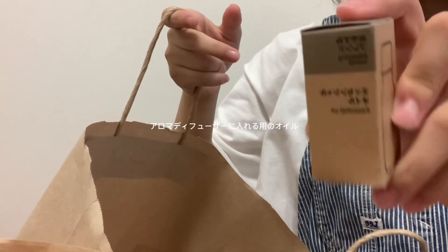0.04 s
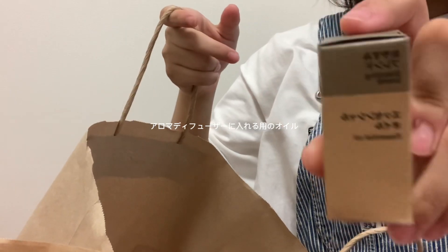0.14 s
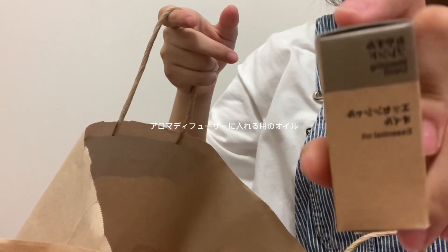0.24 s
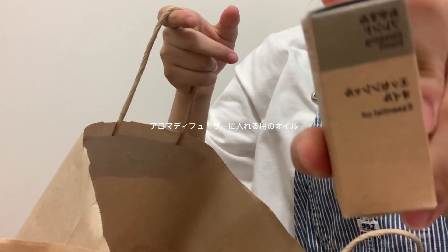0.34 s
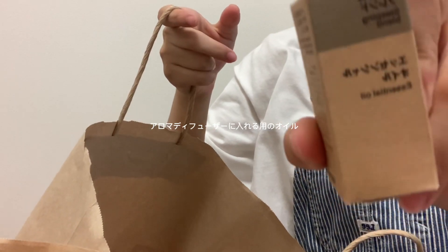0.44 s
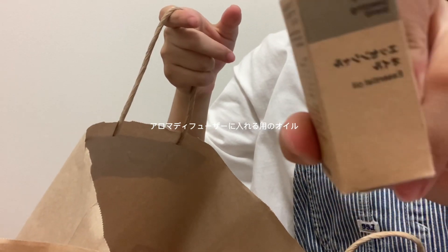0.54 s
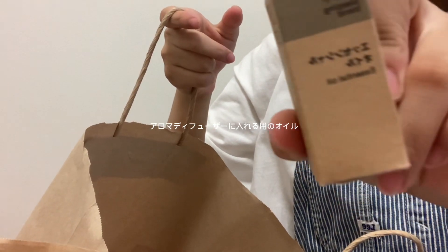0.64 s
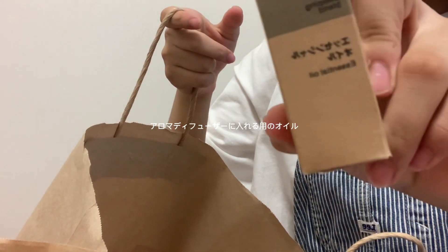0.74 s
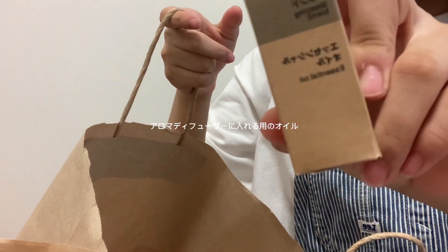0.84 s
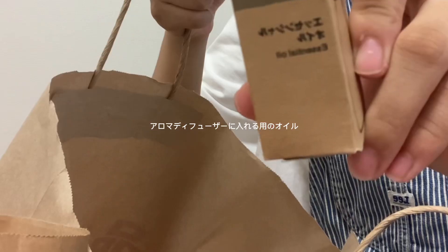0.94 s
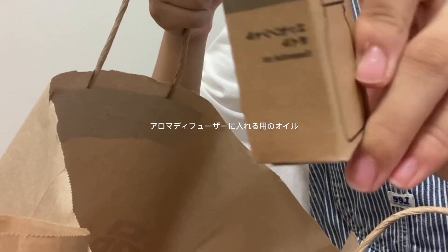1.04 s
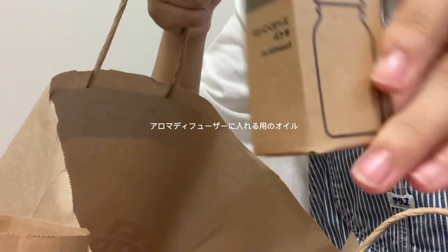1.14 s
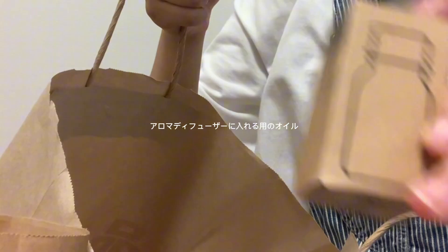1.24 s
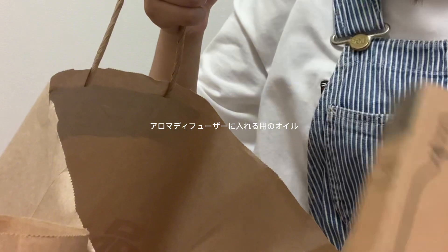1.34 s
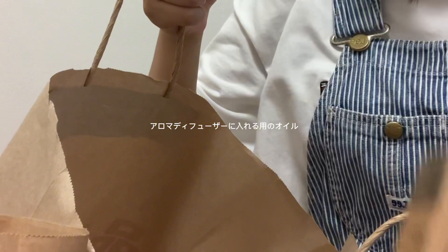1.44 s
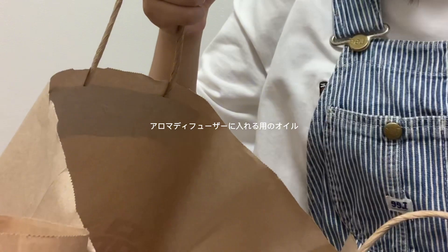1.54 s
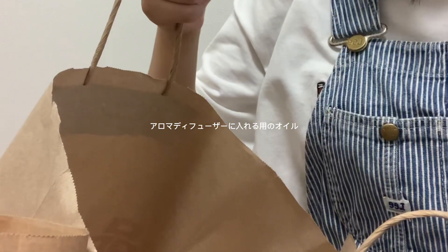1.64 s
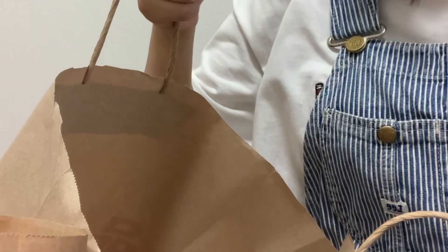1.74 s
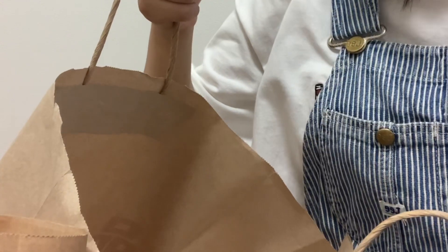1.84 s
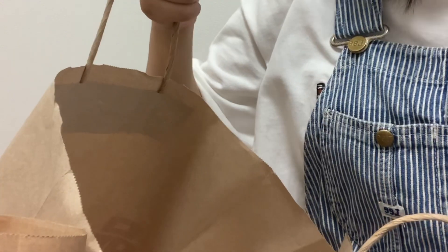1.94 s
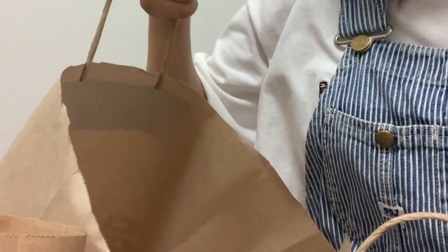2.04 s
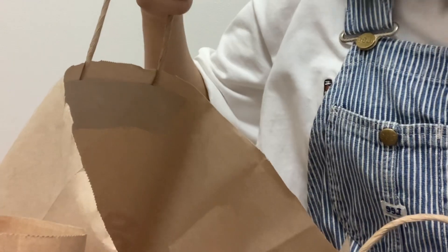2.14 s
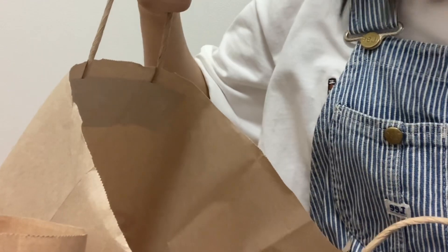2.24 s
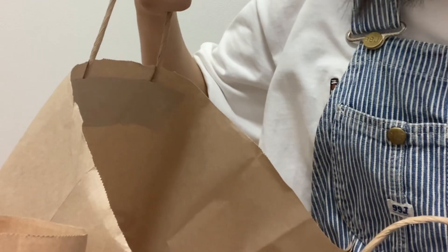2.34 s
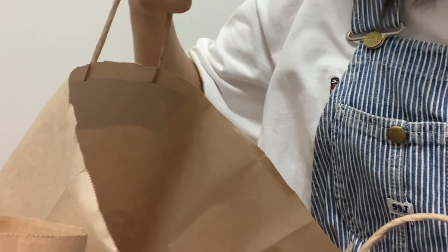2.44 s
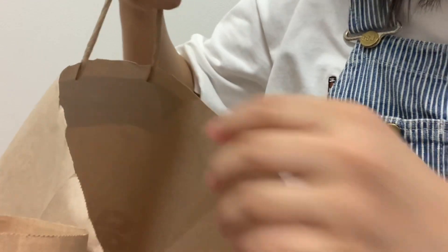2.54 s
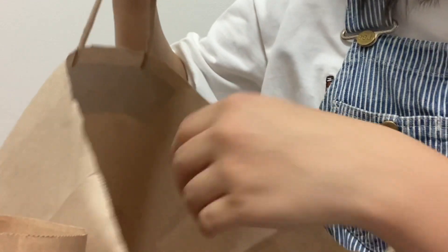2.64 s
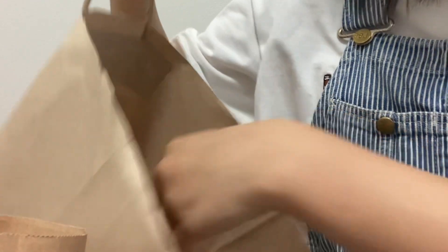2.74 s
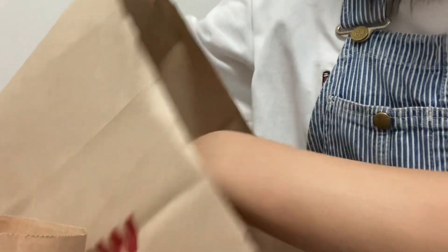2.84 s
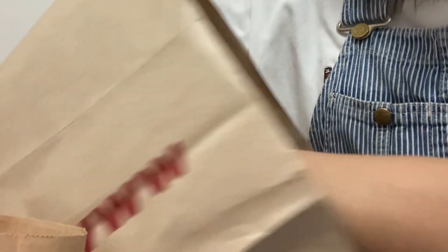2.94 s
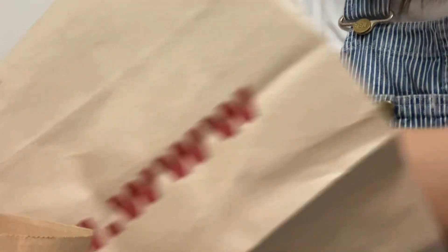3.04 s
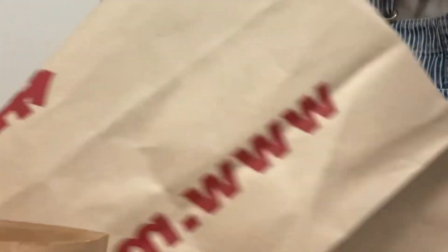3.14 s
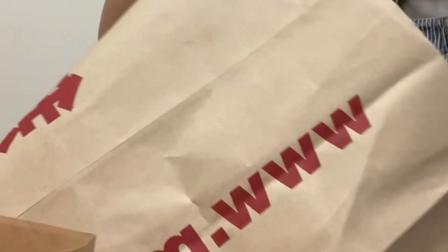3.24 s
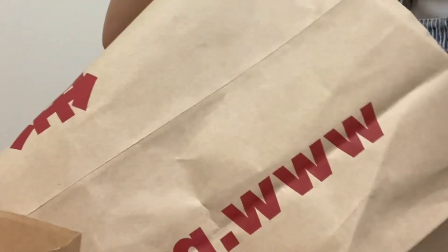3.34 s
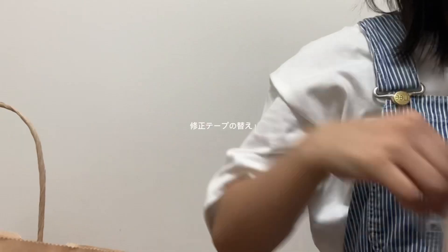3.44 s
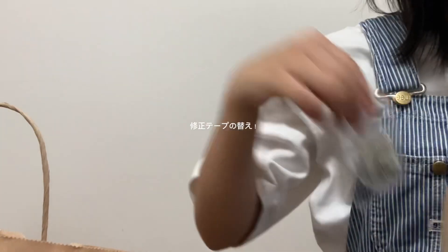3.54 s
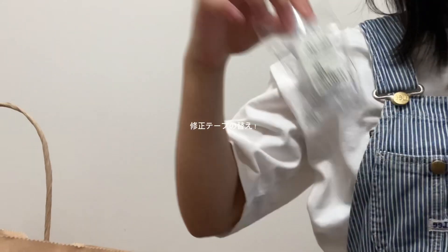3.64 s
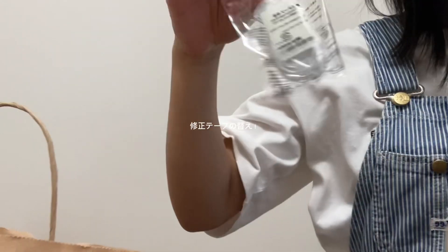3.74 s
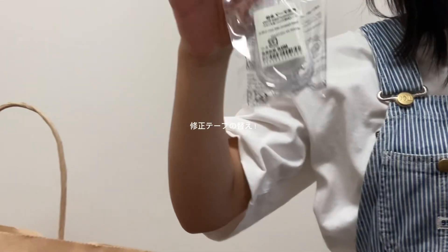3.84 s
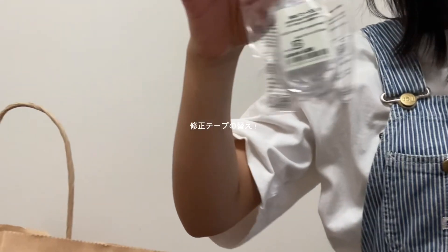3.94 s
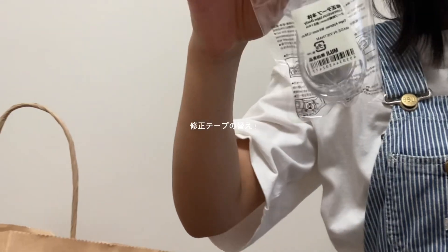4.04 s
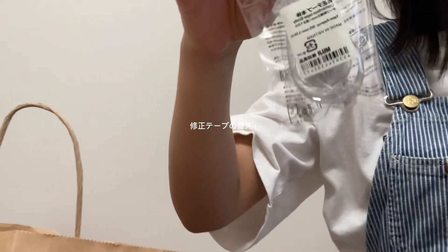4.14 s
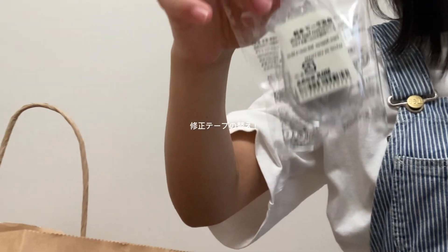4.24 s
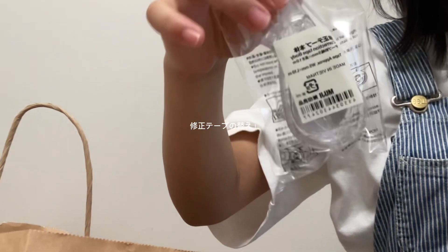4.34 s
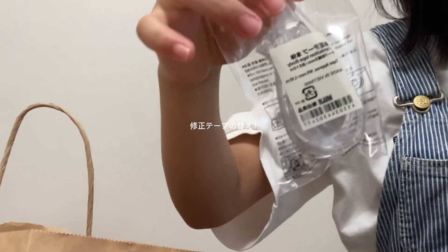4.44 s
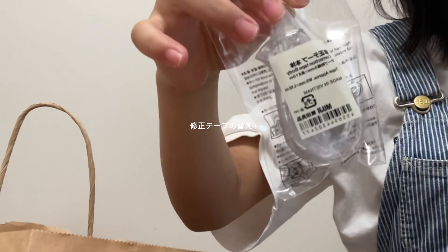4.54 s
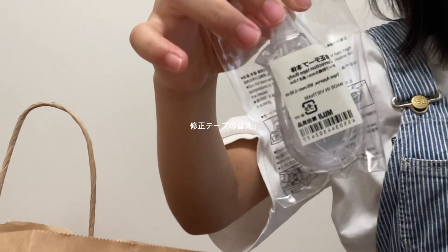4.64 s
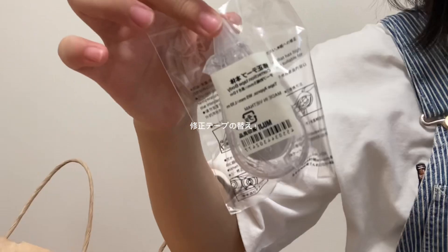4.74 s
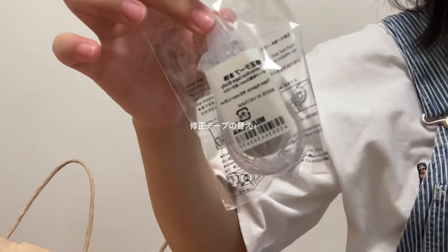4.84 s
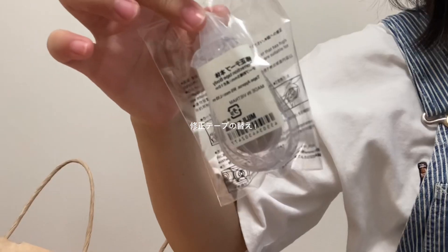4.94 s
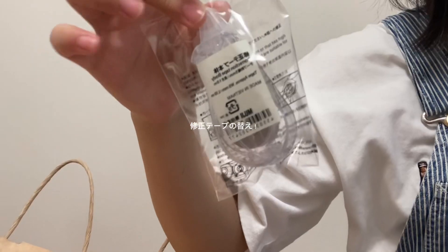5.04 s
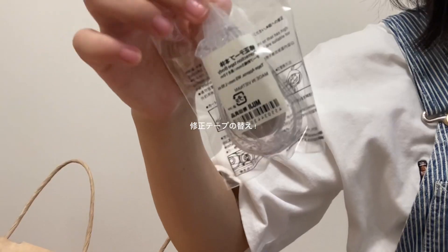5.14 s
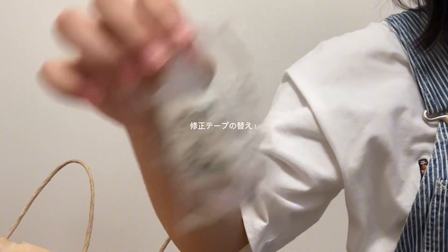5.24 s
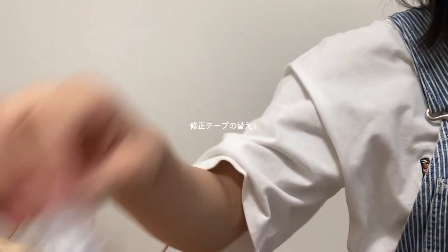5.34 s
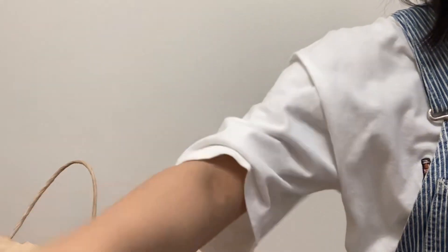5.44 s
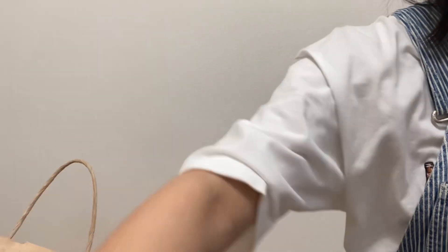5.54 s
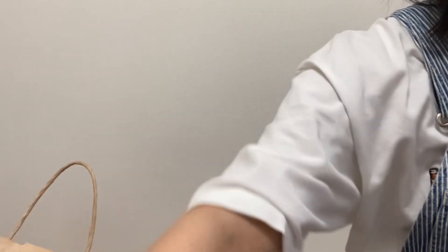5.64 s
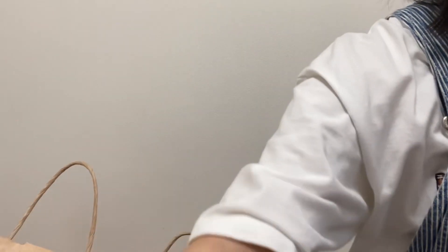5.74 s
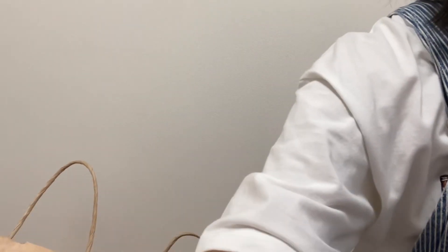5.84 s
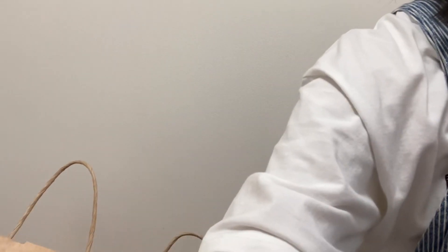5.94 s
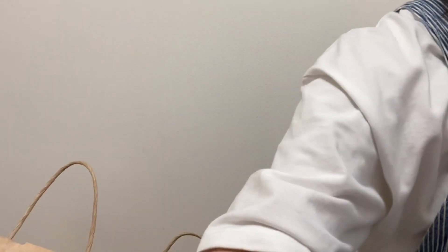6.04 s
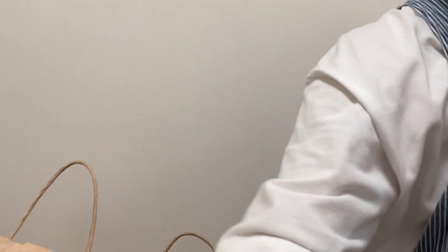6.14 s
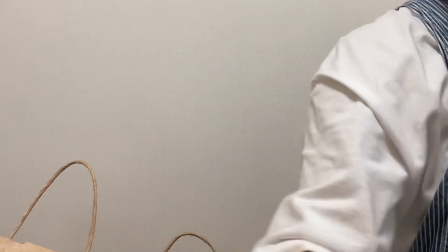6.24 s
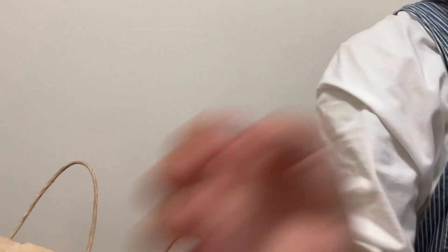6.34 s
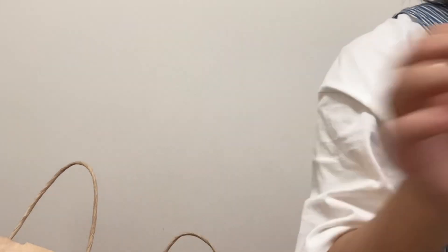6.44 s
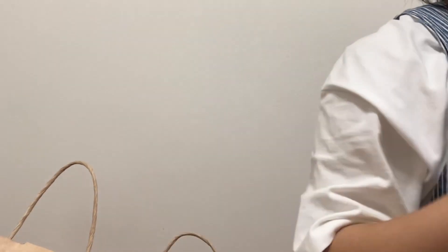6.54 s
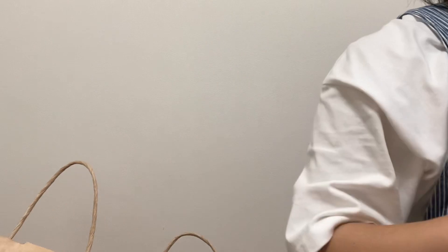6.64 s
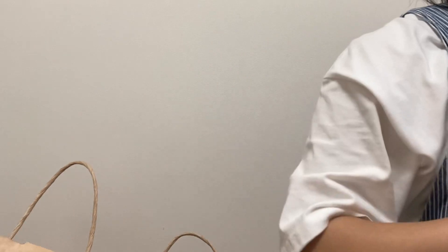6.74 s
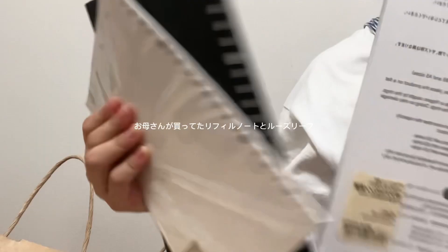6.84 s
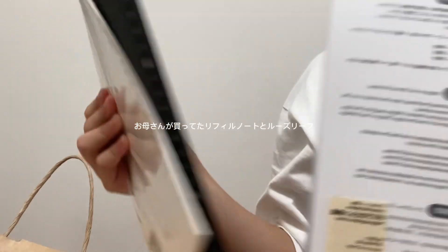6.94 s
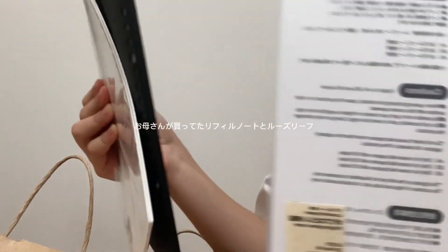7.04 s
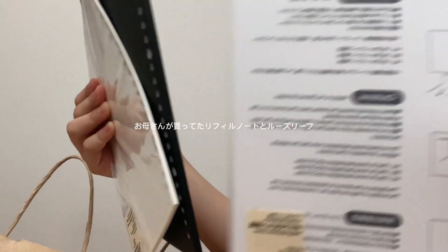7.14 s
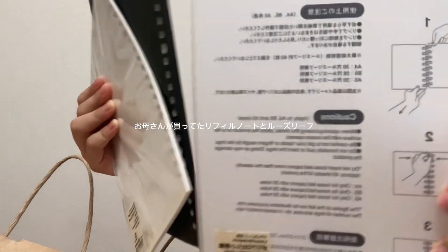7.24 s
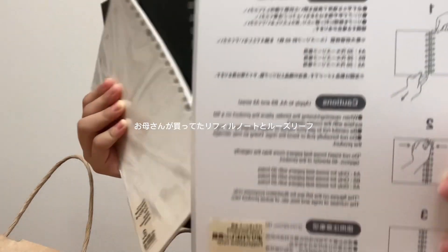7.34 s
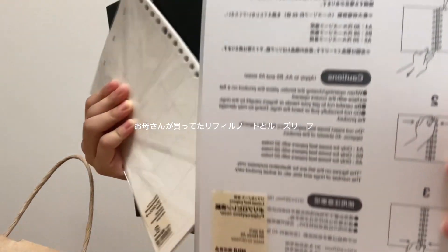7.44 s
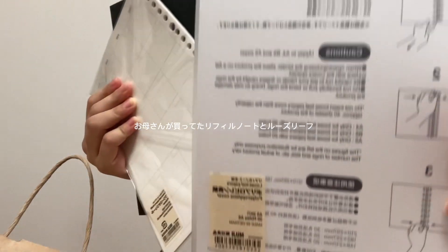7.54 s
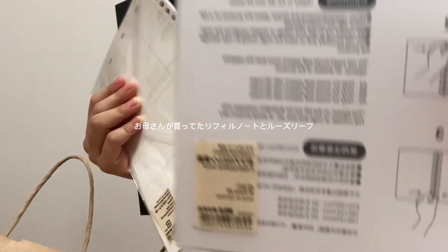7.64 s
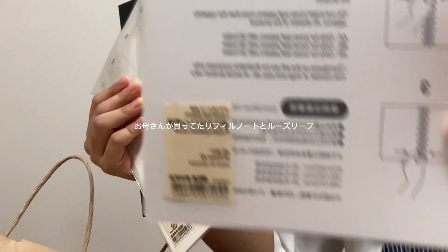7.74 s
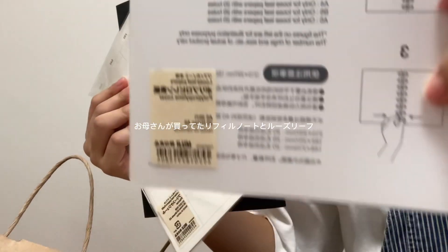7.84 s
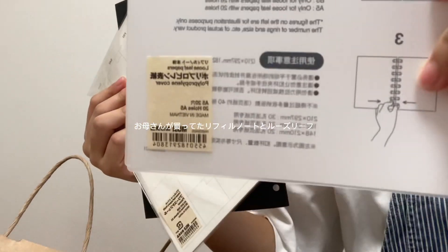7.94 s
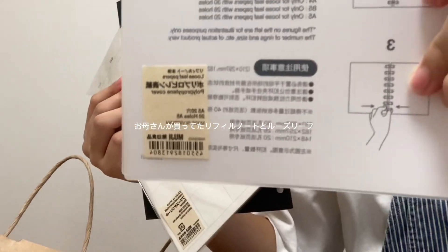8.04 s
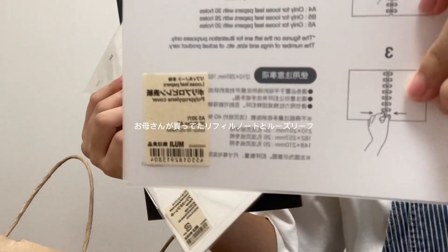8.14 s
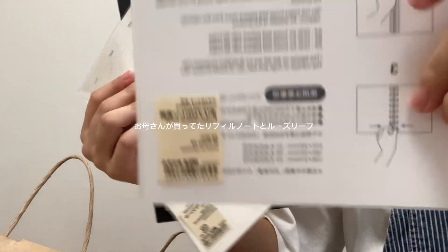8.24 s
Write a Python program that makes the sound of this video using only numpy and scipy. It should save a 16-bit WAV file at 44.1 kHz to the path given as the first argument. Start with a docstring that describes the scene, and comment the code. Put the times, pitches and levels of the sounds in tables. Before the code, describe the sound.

Close dry handling of packaged shopping: faint cardboard taps, a burst of stiff paper crumpling, plastic rustles and clacks over very low ventilation rumble.

```python
"""Shopping is unpacked close to the microphone in a small, quiet room, with a faint rumble of ventilation.
First fingers turn a little carton, then a hand rummages in a paper bag that buckles and crackles.
Next a plastic pouch is shaken and put down, and last some wrapped notebooks are lifted out.
Touches are short noise bursts, stiff panels are dying sine tones, and rustle is coloured grains and hiss.
Crackles are tiny tones. The ventilation is filtered noise, and the room answers with noise-like echoes."""
import sys
import numpy as np
from scipy import signal
from scipy.fft import rfft, irfft, next_fast_len
from scipy.io import wavfile
from scipy.ndimage import uniform_filter1d, map_coordinates

SR = 44100
rng = np.random.default_rng(int(sys.argv[2]) if len(sys.argv) > 2 else 0)


def store_wav(level_fs):
    """Save 16-bit WAV to argv[1]."""
    pcm = np.round(np.clip(np.atleast_2d(level_fs), -1, 1) * 32767)
    wavfile.write(sys.argv[1], SR, pcm.T.astype(np.int16))


N = 364707
TIME = np.arange(N) / SR

# Still air. Each row: frequency in Hz, relative level in dB per Hz.
AIR_SPECTRUM = [(20, -12), (28, -10), (60, -5), (82, -6.5), (115, -14.5), (200, -24), (400, -33),
                (1000, -50), (2500, -60.5), (6500, -64), (9000, -52), (15000, -55.5)]
# Diffuse sound. Each row: frequency in Hz, left-right likeness from -1 to 1.
EAR_LIKENESS = [(50, 0.67), (200, 0.92), (500, 0.53), (1000, 0.4), (2000, -0.28), (4000, 0.28),
                (9000, 0.13)]
# What the room gives back. Each row: frequency in Hz, relative level in dB.
ROOM_SPECTRUM = [(80, -7.5), (200, -2.5), (400, 0.5), (1000, -3), (4000, 1), (9000, -0.5), (15000, -4.5)]
# Where the hands work. Each row: time in seconds, lag of the left ear in ms, how much louder it is in dB.
HAND_PLACES = [(0, 0.17, 2.5), (.1, -0.027, 2.5), (2.799, -0.068, 1.5), (3.2, -0.22, 1), (3.5, 0.15, 0),
               (4.4, 0.24, 0.5), (6.2, .24, 0.5), (8.27, .24, 3)]

# Colours of the rustle: bending, rubbing and fine crinkle. Each row: frequency in Hz, relative dB per Hz.
FLEX_SPECTRUM = [(50, -17), (90, 4.5), (150, -5.5), (250, -1), (380, -2), (550, -6.5), (900, -15.5),
                 (2000, -50.5)]
RUB_SPECTRUM = [(300, -26.5), (600, -8), (1000, 0.5), (1600, -2), (2600, -5.5), (4000, -13.5), (6500, -17),
                (12000, -46)]
CRINKLE_SPECTRUM = [(2000, -18.5), (4200, 1), (5500, -2.5), (6800, -0.5), (8800, 1.5), (10500, -4.5),
                    (14500, -1), (16000, -27)]
# The things never lie quite still in the hands. Each row: time in seconds, light rubbing in relative dB.
FIDGETING = [(0, -57.5), (.35, -79), (.7, -83.5), (1.1, -81.5), (1.25, -76), (2.15, -63.5), (2.34, -64),
             (2.41, -81.5), (2.48, -65), (2.62, -52.5), (3.7, -52.5), (4.25, -59.5), (4.65, -48.5),
             (4.78, -47.5), (4.98, -94), (5.9, -50.5), (6.45, -53), (6.72, -67.5), (7.25, -82), (7.5, -88),
             (8.27, -84)]
# Strokes of the hand: turning the carton, rummaging, shaking the pouch, drawing out the notebooks.
# Each row: start in seconds, hold in seconds, then rubbing, flexing and fine crinkle in relative dB.
HAND_STROKES = [ (0.0, 0.013, -47.5, -67, -55), (0.15, 0.0083, -48, -44.5, -82),
                (1.16, 0.012, -57.5, -61.5, -78), (1.93, 0.061, -64.5, -68, -63),
                (2.04, .02, -55, -49, -66), (2.24, 0.051, -65.5, -50.5, -71),
                (2.534, 0.023, -42, -35.5, -63), (2.765, 0.054, -37, -37, -51),
                (2.94, 0.0092, -46.5, -35.5, -47), (3.044, 0.13, -35, -37.5, -38.5),
                (3.158, 0.011, -31, -29, -46), (3.27, 0.11, -46, -45, -56),
                (3.471, 0.054, -42.5, -44.5, -55), (3.56, 0.04, -42, -41, -47),
                (3.66, 0.085, -45, -47, -52), (4.02, 0.022, -59, -49, -66), (4.401, 0.014, -36.5, -39, -45),
                (4.468, 0.024, -34.5, -37, -45), (4.52, 0.021, -43.5, -44.5, -43.5),
                (4.57, 0.1, -48, -50.5, -55.5), (4.82, 0.061, -49.5, -53.5, -59.5),
                (4.91, 0.062, -57.5, -47, -75), (5.03, 0.057, -58, -58.5, -64),
                (5.159, 0.0083, -44, -55, -42.5), (5.22, 0.017, -46.5, -52.5, -48.5),
                (5.3, 0.1, -51, -54.5, -61.5), (5.41, 0.057, -55.5, -64, -54),
                (5.664, 0.056, -48, -57.5, -49.5), (5.738, 0.05, -45.5, -62, -45.5),
                (5.979, .15, -39.5, -39.5, -48.5), (6.197, 0.036, -37, -46.5, -39),
                (6.43, 0.038, -43, -50.5, -49), (6.53, 0.056, -55.5, -54, -59.5),
                (6.779, 0.046, -63.5, -58.5, -67), (7.24, 0.049, -67.5, -54.5, -73)]

# The paper bag crumpling in separate crackles. Each row: time in seconds, relative level in dB.
BAG_CRUMPLING = [(2.45, -104), (2.53, -48), (2.68, -45.5), (2.775, -33.5), (2.82, -39), (2.89, -66),
                 (3.0, -42), (3.09, -36.5), (3.17, -27.5), (3.21, -41), (3.29, -39.5), (3.5, -49.5),
                 (3.56, -34.5), (3.75, -53), (3.95, -87)]
# Clean knocks that set a stiff panel of card, paper or plastic ringing.
# Each row: start in seconds, relative level in dB, pitch in Hz, cycles until it has died away by 60 dB.
KNOCKS_ON_PANELS = [ (0.0075, -34, 375, 45), (0.1175, -46, 3850, 110), (0.1285, -45, 1320, 16),
                    (0.146, -42, 395, 20), (0.1605, -39, 420, 16), (0.2065, -39, 1486, 51),
                    (0.2295, -44.5, 1546, 53), (0.4775, -54.5, 1530, 27), (0.803, -60.5, 1475, 22),
                    (0.925, -62.5, 1400, 16), (1.9755, -54, 1970, 40), (2.0045, -51.5, 1080, 20),
                    (2.015, -46, 350, 34), (2.034, -49, 1360, 20), (2.279, -54.5, 1120, 71),
                    (2.537, -30, 410, 8.6), (2.5615, -32.5, 900, 17), (2.668, -32.5, 346, 6.1),
                    (2.7205, -34, 850, 13), (2.7125, -26.5, 1620, 14), (2.7605, -32, 2140, 11),
                    (3.1235, -22, 3730, 29), (3.1645, -25, 1190, 6.8), (3.170, -29, 428, 13),
                    (3.2905, -30, 290, 5.9), (3.5475, -27, 1030, 19), (3.969, -36, 1220, 14),
                    (4.002, -21.5, 1744, 29), (4.007, -29.5, 490, 17), (4.4085, -25.5, 360, 15.7),
                    (4.421, -38, 284, 4), (4.471, -30.5, 1670, 9.6), (4.4815, -34.5, 505, 9.8),
                    (4.596, -39, 910, 16), (4.7135, -30, 413, 19), (4.768, -25.5, 1320, 18.5),
                    (4.8635, -29, 307, 14), (5.984, -37.5, 424, 16), (6.055, -34, 474, 16),
                    (6.188, -24.5, 1070, 45), (6.1885, -26, 4100, 41), (6.393, -33.5, 552, 23),
                    (7.0415, -49, 1084, 18), (7.051, -53.5, 1125, 19), (7.065, -59, 996, 14),
                    (7.162, -65, 1290, 8), (7.177, -49.5, 1284, 9.3), (7.2505, -36.5, 397, 12.6),
                    (7.304, -56, 1400, 12), (7.545, -63, 1400, 13), (7.7615, -51, 958, 9.8),
                    (8.134, -60, 1080, 11), (8.168, -51, 320, 9), (8.199, -53.5, 1000, 10)]
# Ways such a panel vibrates. Each row: multiple of its pitch, dB for a knock of the usual number of cycles.
PANEL_VIBRATIONS = [(0.359, -14.5), (0.6, -11), (0.83, -6), (0.999, 0), (1.2, -6.5), (1.65, -10),
                    (2.5, -18)]

# Four tables of touches: fingers on the carton, the bag's handle and the clothes; creases of the paper bag
# giving way; packaged goods knocking against each other and the hand; thin plastic wrappers snapping.
# Each row: time in seconds, relative body level in dB, pitch in Hz, relative tick level in dB,
# length in seconds (the contacts use at least 0.002).
CARTON_TAPS = [(0.119, -50, 1870, -44.5, 0.03), (0.1583, -43, 1020, -53, 0.026),
               (0.2075, -57, 2000, -50, 0.016), (0.2312, -62, 2000, -55, 0.016),
               (0.314, -51.5, 377, -64, 0.026), (0.7886, -58.5, 515, -85, 0.023),
               (1.139, -47.5, 995, -76, 0.012), (1.2384, -52.5, 1130, -56.5, 0.007),
               (1.6125, -58, 1850, -50.5, 0.0052), (1.7245, -64, 2800, -71, 0.007),
               (1.781, -66, 1430, -58, 0.028), (1.91, -62, 324, -73, 0.031), (2.0264, -55, 510, -65, 0.064),
               (2.0774, -50, 2470, -48.5, 0.012), (2.095, -46.5, 2580, -54, 0.0058)]
CREASE_BUCKLES = [(2.4954, -33.5, 1600, -42.5, 0.011), (2.507, -30.5, 970, -61.5, 0.035),
                  (2.6593, -31, 1980, -47, 0.034), (2.6918, -25.5, 1070, -39.5, 0.019),
                  (2.7175, -21, 1707, -35, 0.032), (2.7448, -27, 1940, -41.5, 0.0058),
                  (2.7805, -34.5, 1700, -54, 0.016), (2.866, -42, 1106, -57, 0.015),
                  (3.064, -36, 2508, -53.5, 0.017), (2.8155, -34, 1190, -38, 0.014),
                  (2.9243, -32, 1560, -46, 0.045), (2.9345, -25.5, 1620, -29.5, 0.023),
                  (3.0232, -28, 900, -39, 0.044), (3.1272, -23, 1150, -45.5, .008),
                  (3.1755, -24.5, 990, -40.5, 0.028), (3.2418, -30.5, 4470, -50, 0.0064),
                  (3.2448, -26, 1510, -50.5, 0.01), (3.274, -36, 1210, -62, 0.023),
                  (3.3148, -36, 3740, -50, 0.0089), (3.3656, -38.5, 2900, -41, 0.026),
                  (3.3977, -33.5, 3100, -37.5, 0.003), (3.5431, -17.5, 1470, -53, 0.042)]
GOODS_KNOCKS = [(0.0042, -27, 1900, -23.5, 0.0062), (3.976, -36.5, 1300, -65, 0.045),
                (4.003, -32.5, 1900, -60, 0.03), (4.0165, -31.5, 955, -66.5, 0.023),
                (4.3845, -22.5, 1400, -33.5, 0.016), (4.4072, -28, 1700, -58, 0.033),
                (4.469, -25.5, 2100, -35, 0.028), (4.5095, -29, 1740, -26.5, 0.0069),
                (4.7155, -35, 2500, -60, 0.026), (5.6655, -46.5, 1430, -56, 0.029),
                (5.9374, -36.5, 940, -32, 0.025), (5.9615, -28.5, 1107, -48, 0.04),
                (6.0115, -33.5, 1300, -52, .012), (6.0315, -30, 1770, -37, 0.014),
                (6.1025, -30.5, 1140, -62, 0.012), (6.1897, -25, 2700, -17, 0.0045),
                (6.198, -27, 2300, -29.5, 0.031), (6.215, -24, 2100, -33.5, 0.032),
                (6.3835, -27.5, 1270, -71.5, 0.0194), (6.3955, -30.5, 1400, -70, 0.017),
                (6.408, -37, 900, -70, .016), (6.563, -49.5, 1340, -55, 0.0072),
                (6.5796, -40.5, 790, -52.5, 0.02)]
PLASTIC_SNAPS = [(3.4555, -44.5, 1310, -55, 0.0044), (3.4712, -49.5, 1410, -39, 0.0076),
                 (3.591, -38, 4700, -58, 0.0062), (3.6065, -38, 4700, -58, 0.0062),
                 (4.289, -50.5, 1530, -74, 0.01), (4.6835, -27.5, 2300, -33.5, 0.0046),
                 (4.7688, -32, 2060, -58, 0.0062), (5.0099, -46, 1130, -53.5, 0.038),
                 (5.055, -60, 1220, -49.5, 0.011), (5.21, -42, 1010, -68, 0.014),
                 (5.2551, -38, 940, -65, 0.0089), (5.273, -42, 3430, -29, 0.0038),
                 (5.396, -47, 2270, -32, 0.013), (5.4969, -42.5, 2950, -34, 0.015),
                 (5.587, -69.5, 1530, -47, 0.0017), (5.898, -48.5, 3520, -42, 0.0022),
                 (6.7783, -69.5, 900, -57, 0.0096), (6.991, -64.5, 2460, -60, 0.0077),
                 (7.044, -52.5, 1500, -56.5, 0.081), (7.238, -46.5, 1200, -67, 0.027),
                 (7.2505, -36, 1040, -34, 0.0083), (8.2, -57.5, 1900, -77, 0.0069),
                 (8.2385, -56, 1300, -65.5, 0.0068)]

# Resonances of the carton, the bag's hollow and the microphone port.
# Each row: frequency in Hz, width in Hz, boost or cut in dB.
CARTON_RESONANCES = [(347, 48, 3), (1495, 280, 10.5), (3660, 2100, 4.5)]
BAG_RESONANCES = [(358, 24, 2.6), (512, 54, 7.8)]
MICROPHONE_RESONANCES = [(603, 120, -2.5), (6320, 2600, -5.5), (10040, 3200, 8), (11260, 816, -33)]
# Moments at which the level dips briefly. Each entry: time in seconds.
LEVEL_DIPS = [3.407, 4.750, 6.840]

# The ventilation's levels are before its left-right balance.
AIR_DB, FAN_HZ, FAN_WIDTH_HZ, FAN_DB = -50.5, 44.55, 10, -51
# T60 is the time to fade by 60 dB.
ROOM_T60_S, EARLY_T60_S, TAIL_DB, TAIL_CUT_HZ = 0.46, 0.14, -12, 2500
CUTOFF_HZ = 16300
SWELL_DB_PER_S, FADE_DB_PER_S = 444.5, 296.5
# Flexing and crinkle follow the light rubbing: (dB at the usual rubbing, share of its swing).
USUAL_RUB_DB, FLEX_FOLLOWS, CRINKLE_FOLLOWS = -58.5, (-59.5, 1), (-63.5, 0.79)
# A knock that rings longer than this has caught the main mode squarely and sounds purer.
USUAL_CYCLES = 15
# Longer contacts push the whole panel and thump more.
USUAL_LENGTH_S, THUMP_DB_PER_OCTAVE = 0.02, 2.5


def from_db(db):
    """Turn decibels into a gain."""
    return np.exp(np.asarray(db) * (np.log(10) / 20))


def rms_one(x):
    """Scale a signal to an average (rms) strength of 1."""
    return x / np.sqrt(np.mean(x ** 2) + 1e-20)


def at_hz(points, hz):
    """Read a table between its points, on a log-frequency axis."""
    points = np.array(points)
    return np.interp(np.log(hz + 1), np.log(points[:, 0]), points[:, 1])


def band(x, low_hz, high_hz, order):
    """Keep only the sound between two frequencies."""
    sos = signal.butter(order, [low_hz, high_hz], "band", fs=SR, output="sos")
    return signal.sosfilt(sos, x)


def resonate(x, modes):
    """Pass a sound through a chain of resonances, each a peak or a dip."""
    for hz, width_hz, db in modes:
        turn = 2 * np.pi * hz / SR
        gain = from_db(db / 2)
        damp = np.pi * width_hz / SR
        top = [1 + damp * gain, -2 * np.cos(turn), 1 - damp * gain]
        bottom = [1 + damp / gain, -2 * np.cos(turn), 1 - damp / gain]
        x = signal.lfilter(top, bottom, x + 1e-18)
    return x


def colour(x, spectrum):
    """Give a signal a smooth spectrum."""
    size = next_fast_len(x.shape[-1] + 4096, real=True)
    gain = from_db(at_hz(spectrum, np.fft.rfftfreq(size, 1 / SR)))
    return irfft(rfft(x, size) * gain, size)[..., :x.shape[-1]]


def drift(rate):
    """Wander slowly by chance, with a spread of 1 and this many turning points a second."""
    knots = rng.standard_normal(int(N / SR * rate) + 2)
    return rms_one(np.interp(TIME * rate, np.arange(len(knots)), knots))


def diffuse(pair):
    """Mix two unrelated signals to left and right, as alike at each frequency as the table says."""
    size = next_fast_len(pair.shape[1] + 4096)
    alike = np.clip(at_hz(EAR_LIKENESS, np.fft.rfftfreq(size, 1 / SR)), -.99, .99)
    mid, side = rfft(pair, size) * np.sqrt([1 + alike, 1 - alike])
    return irfft(np.array([mid + side, mid - side]), size)[:, :pair.shape[1]]


def wide(pair, width_db):
    """A sheet is wide, so each ear hears a slightly different sound."""
    return pair[0] + from_db(width_db) * pair[1] * np.array([[1], [-1]])


def ventilation():
    """A narrow, throbbing rumble and the faint hiss of the air, slightly louder on the right."""
    # one extra second lets the narrow filter settle
    noise = rng.standard_normal(N + SR)
    rumble = band(noise, FAN_HZ - FAN_WIDTH_HZ / 2, FAN_HZ + FAN_WIDTH_HZ / 2, order=2)[SR:]
    air = diffuse(colour(rng.standard_normal((2, N)), AIR_SPECTRUM))
    balance = from_db([[-1.1], [1.1]])
    return (from_db(FAN_DB) * rms_one(rumble) + from_db(AIR_DB) * rms_one(air)) * balance


def room(x):
    """Dense early echoes from table and walls, then a weak, duller tail."""
    t = np.arange(int(.5 * SR)) / SR
    early, late = rng.standard_normal((2, 2, len(t)))
    late = signal.sosfilt(signal.butter(1, TAIL_CUT_HZ, fs=SR, output="sos"), late)
    decay = early * from_db(-60 * t / EARLY_T60_S) + late * from_db(TAIL_DB - 60 * t / ROOM_T60_S)
    # the echoes start after 1 ms and build up over 2 ms
    onset = np.clip((t - .001) / .002, 0, 1)
    echoes = rms_one(diffuse(colour(decay * onset, ROOM_SPECTRUM))) / np.sqrt(len(t))
    mono = x.mean(axis=0)[None]
    return signal.oaconvolve(mono, echoes, axes=1)[:, :N]


def placed(x):
    """Direct sound reaches the farther ear a little later, and the two ears at different levels."""
    s, lags_ms, balances_db = np.transpose(HAND_PLACES)
    lag = np.interp(TIME, s, lags_ms) * SR / 1000
    gain = from_db(np.interp(TIME, s, balances_db) / 2)
    left = gain * map_coordinates(x[0], [np.arange(N) - lag / 2], order=2)
    right = map_coordinates(x[1], [np.arange(N) + lag / 2], order=2) / gain
    return np.array([left, right])


def handling():
    """Levels of rubbing, flexing and crinkle: each stroke swells, holds and fades over the light fidgeting."""
    light_db = np.interp(TIME, *np.transpose(FIDGETING))
    levels_db = [light_db]
    for usual_db, share in (FLEX_FOLLOWS, CRINKLE_FOLLOWS):
        levels_db.append(usual_db + share * (light_db - USUAL_RUB_DB))
    levels_db = np.array(levels_db)
    for s, held, *peaks_db in HAND_STROKES:
        swell_db = SWELL_DB_PER_S * (TIME - s)
        fade_db = FADE_DB_PER_S * (s + held - TIME)
        shape_db = np.minimum(0, np.minimum(swell_db, fade_db))
        # the louder of stroke and fidgeting wins
        levels_db = np.maximum(levels_db, np.add.outer(peaks_db, shape_db))
    return levels_db


def rustle(level_db, spectrum, per_s, size_db, hiss_db, clump_db, width_db):
    """Fibres catch and let go in clumps of grains, over the smooth hiss of sliding."""
    sizes = from_db(size_db * np.minimum(rng.exponential(1, N), 4))
    grains = (rng.random(N) < per_s / SR) * sizes * rng.standard_normal((2, N))
    friction = rms_one(grains) + from_db(hiss_db) * rng.standard_normal((2, N))
    clumped = friction * from_db(clump_db * drift(90))
    return from_db(level_db) * rms_one(wide(colour(clumped, spectrum), width_db))


def creases(level_db, per_s, size_db, low_hz, high_hz, cycles):
    """Small facets of the sheet pop one by one, each ringing briefly at a pitch of its own."""
    starts = np.flatnonzero(rng.random(N) < per_s / SR)
    draws = rng.random((len(starts), 4))
    heights = from_db(size_db * draws[:, 0]) * np.sign(draws[:, 1] - .5)
    pitches = low_hz * (high_hz / low_hz) ** draws[:, 2]
    size = 2048
    out, t = np.zeros((2, N + size)), np.arange(size) / SR
    for start, height, hz, skew in zip(starts, heights, pitches, draws[:, 3] - .5):
        ring = np.sin(2 * np.pi * hz * t) * from_db(-60 * hz * t / cycles)
        # a tilted facet radiates more towards one ear
        out[:, start:start + size] += height * np.outer([1 + 2 * skew, 1 - 2 * skew], ring)
    return from_db(level_db) * rms_one(out[:, :N])


def shifting(x, patchy_db, per_s, count):
    """A bending sheet keeps changing shape, so its resonances come and go, each band on its own."""
    size = next_fast_len(N + 4096, real=True)
    log_centres = np.log(np.geomspace(250, 7000, count))
    log_hz = np.log(np.fft.rfftfreq(size, 1 / SR) + 1)
    band_number = np.interp(log_hz, log_centres, np.arange(count))
    spectrum, out = rfft(x, size), 0
    for k in range(count):
        # neighbouring bands overlap like triangles
        share = np.maximum(0, 1 - np.abs(band_number - k))
        part = irfft(spectrum * share, size)[:, :N]
        out = out + part * rms_one(from_db(patchy_db * drift(per_s)))
    return out


def rustling_sheets():
    """Sheets bend, rub, crinkle and pop under the hand, with the mix changing band by band."""
    rub_db, flex_db, crinkle_db = handling()
    flex = rustle(flex_db, FLEX_SPECTRUM, per_s=220, size_db=1.5, hiss_db=-2.0, clump_db=0.5, width_db=-13.0)
    rub = rustle(rub_db, RUB_SPECTRUM, per_s=400, size_db=1.5, hiss_db=6.0, clump_db=1.5, width_db=-3.0)
    crinkle = rustle(crinkle_db, CRINKLE_SPECTRUM, per_s=510, size_db=0.5, hiss_db=2.0, clump_db=1.5,
                     width_db=0.5)
    pops = creases(rub_db - 6.5, per_s=130, size_db=17.5, low_hz=543, high_hz=4400, cycles=13.0)
    sheets = from_db(1.84) * flex + from_db(-1.0) * rub + from_db(4.0) * crinkle + pops
    return shifting(sheets, patchy_db=4.0, per_s=60, count=18)


def crumple():
    """While the hand is in the bag, its walls crackle in sharp, uneven pops."""
    level_db = np.interp(TIME, *np.transpose(BAG_CRUMPLING), left=-np.inf, right=-np.inf)
    return creases(level_db, per_s=170, size_db=24.0, low_hz=560, high_hz=5000, cycles=10.0)


def panel_knocks(table, rise_cycles, scatter_db, detune, width_db):
    """Each knock swells over a cycle or so and rings in the panel's modes, in a mix that varies by chance."""
    size = 6144
    out, t = np.zeros((2, N + size)), np.arange(size) / SR
    # levels are counted as if each sound's energy were spread over 10 ms
    to_ten_ms = np.sqrt(.01 * SR / size)
    multiples, modes_db = np.transpose(PANEL_VIBRATIONS)
    signs = (-1) ** np.arange(len(multiples))
    chances = rng.standard_normal((len(table), 3, len(multiples)))
    for (s, db, hz, cycles), (pitch_chance, level_chance, side_chance) in zip(table, chances):
        turns = np.outer(hz * multiples * (1 + detune * pitch_chance), t)
        swell = 1 - np.exp(-hz * t / rise_cycles)
        rings = np.sin(2 * np.pi * turns) * from_db(-60 * turns / cycles) * swell
        purity = np.sqrt(cycles / USUAL_CYCLES)
        gains = from_db(modes_db * purity + scatter_db * level_chance) * signs
        hit = wide([gains @ rings, (gains * side_chance) @ rings], width_db)
        start = int(np.clip(round(s * SR), 0, N))
        out[:, start:start + size] += from_db(db) * to_ten_ms * rms_one(hit)
    return out[:, :N]


def flutter(count, depth_db):
    """Slips come unevenly, changing in strength about every millisecond."""
    knots = rng.standard_normal(count // 44 + 2)
    return from_db(depth_db * np.interp(np.arange(count) / 44, np.arange(len(knots)), knots))


def with_thump(table, thump_db, follows):
    """Add a thump level to each contact, before the tick level; it grows with strength and length."""
    s, db, hz, tick, length = np.transpose(table)
    from_strength = follows * (db - db.mean())
    from_length = THUMP_DB_PER_OCTAVE * np.log2(length / USUAL_LENGTH_S)
    return np.transpose([s, db, hz, thump_db + from_strength + from_length, tick, length])


def contacts(table, thump_hz, thump_t60, tick_share, rise_share, width_db, ring_db, tick_width_db=-12):
    """A sheet gives way in tiny slips: a sharp tick, its ringing body and a thump of the whole panel."""
    size = 3072
    out, t = np.zeros((2, N + size)), np.arange(size) / SR
    # levels are counted as if each sound's energy were spread over 10 ms
    to_ten_ms = np.sqrt(.01 * SR / size)
    lengths = np.maximum(np.array(table)[:, -1], .002)[:, None, None]
    # six noises for each contact: two for the body, one ring, two for the tick, one thump
    slips = rng.standard_normal((len(table), 6, size)) * (1 - np.exp(-t / (rise_share * lengths)))
    bursts = slips[:, :3] * from_db(-60 * t / lengths)
    ticks = band(slips[:, 3:5] * from_db(-60 * t / (lengths * tick_share)), 4000, 13000, order=2)
    thumps = band(slips[:, 5] * from_db(-60 * t / thump_t60), thump_hz / 3.1, thump_hz * 1.76, order=2)
    for row, burst, tick, thump in zip(table, bursts, ticks, thumps):
        s, body_db, hz, thump_db, tick_db, length = row
        burst = burst * flutter(size, depth_db=3.5)
        body = signal.lfilter(*signal.iirpeak(hz, 1.2, fs=SR), burst[:2])
        body = band(body, hz / 5.2, hz * 3, order=2)
        # the facet that is struck rings on briefly at its own pitch
        ring = signal.lfilter(*signal.iirpeak(hz, 5.8, fs=SR), burst[2])
        body = rms_one(wide(body, width_db)) + from_db(ring_db) * rms_one(ring)
        hit = from_db(body_db) * rms_one(body)
        hit = hit + from_db(tick_db) * rms_one(wide(tick, tick_width_db))
        hit = hit + from_db(thump_db) * rms_one(thump)
        # start a little early, so that the swell is centred near the given time
        start = int(np.clip(round((s - rise_share * length / 2) * SR), 0, N))
        out[:, start:start + size] += to_ten_ms * hit
    return out[:, :N]


def carton_taps():
    """Fingers tap and slip, and their sound is coloured by the carton's resonances."""
    taps = contacts(with_thump(CARTON_TAPS, thump_db=-50.0, follows=0.4), thump_hz=305, thump_t60=0.08,
                    tick_share=0.91, rise_share=0.2, width_db=-9, ring_db=-5.5)
    return resonate(taps, CARTON_RESONANCES)


def paper_bag():
    """Creases buckle and walls crackle, and the hollow of the bag resonates."""
    buckles = contacts(with_thump(CREASE_BUCKLES, thump_db=-33.0, follows=0.45), thump_hz=288,
                       thump_t60=0.061, tick_share=0.59, rise_share=0.17, width_db=-2.5, ring_db=-12.0)
    return from_db(-2.5) * resonate(buckles + crumple(), BAG_RESONANCES)


def packaged_goods():
    """Packaged goods knock against each other and the hand, with little ringing."""
    knocks = contacts(with_thump(GOODS_KNOCKS, thump_db=-35.5, follows=0.44), thump_hz=318,
                      thump_t60=0.043, tick_share=0.88, rise_share=0.2, width_db=-7.0, ring_db=-21)
    return from_db(-1.54) * knocks


def plastic_wrappers():
    """Thin plastic snaps and is touched, with a clear ring at each facet's pitch."""
    return contacts(with_thump(PLASTIC_SNAPS, thump_db=-53.5, follows=0.85), thump_hz=316.2,
                    thump_t60=0.1, tick_share=1.0, rise_share=0.2, width_db=-2.0, ring_db=-5.5)


def scene():
    """Contacts and rustle sound in the room, over the ventilation."""
    sheets = rustling_sheets()
    panels = panel_knocks(KNOCKS_ON_PANELS, rise_cycles=0.77, scatter_db=1.0, detune=0.056, width_db=-5.0)
    taps = carton_taps()
    bag = paper_bag()
    packs = packaged_goods()
    wrappers = plastic_wrappers()
    # each thing is held at its own spot and has its own echoes
    echoes = (from_db(-4.0) * room(taps) + from_db(-5.0) * room(bag) + from_db(-4.5) * room(packs)
              + from_db(-9.5) * room(wrappers) + from_db(-3.5) * room(sheets) + from_db(-9.0) * room(panels))
    direct = placed(taps + bag + packs + wrappers + panels + sheets)
    return direct + echoes + ventilation()


def record(dry):
    """The microphone port colours and notches the treble; the level dips briefly; the top is cut."""
    # each dip is 25 dB deep and about 10 ms long, with edges smoothed over 90 samples
    dip_db = sum(-25 * (np.abs(TIME - s) < .005) for s in LEVEL_DIPS)
    heard = resonate(dry, MICROPHONE_RESONANCES) * uniform_filter1d(from_db(dip_db), size=90)
    top_cut = signal.ellip(10, .2, 80, CUTOFF_HZ, fs=SR, output="sos")
    return signal.sosfilt(top_cut, heard)


dry = scene()
out = record(dry)
store_wav(out)
```